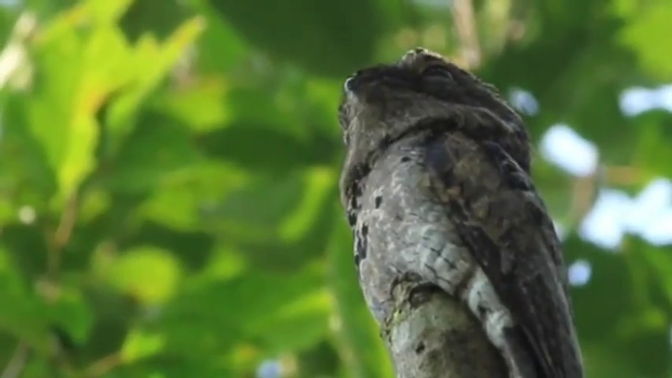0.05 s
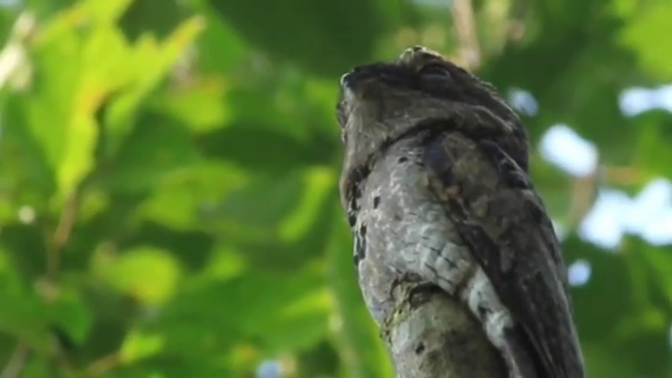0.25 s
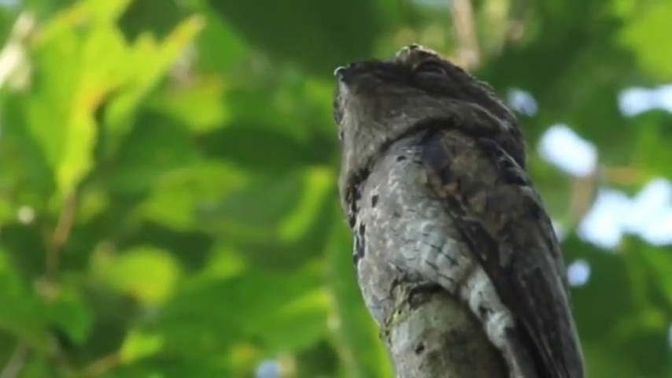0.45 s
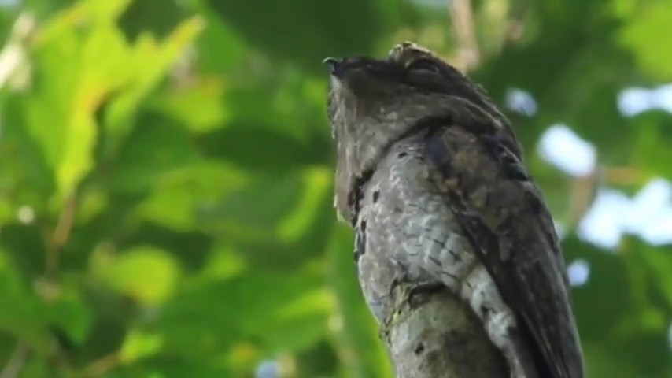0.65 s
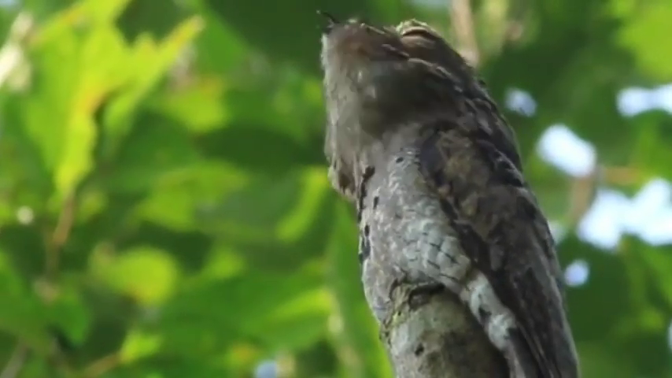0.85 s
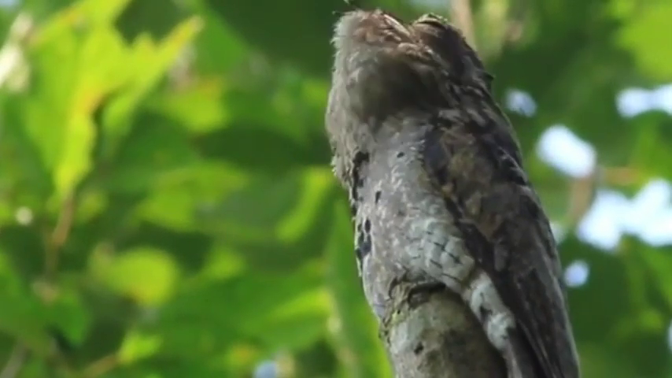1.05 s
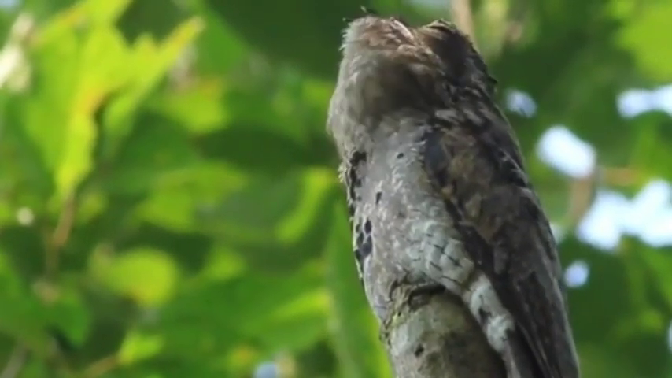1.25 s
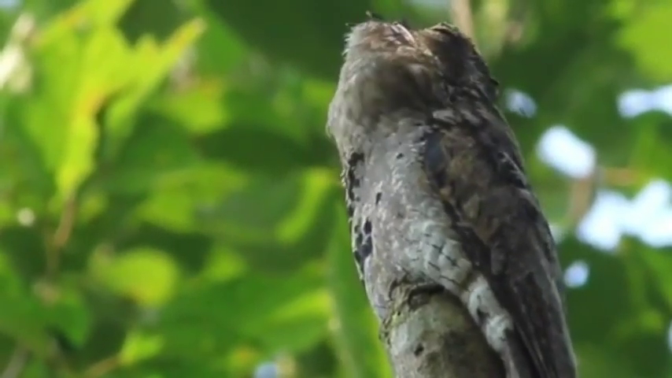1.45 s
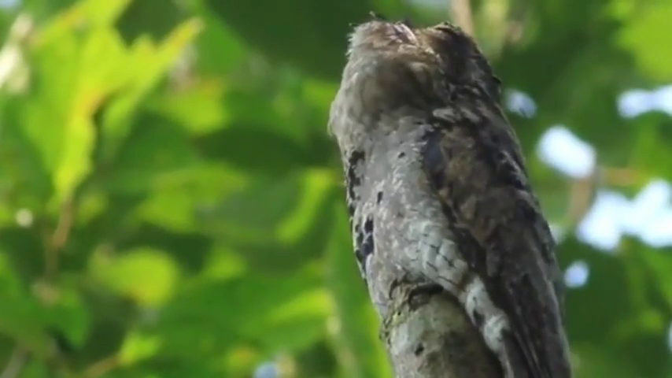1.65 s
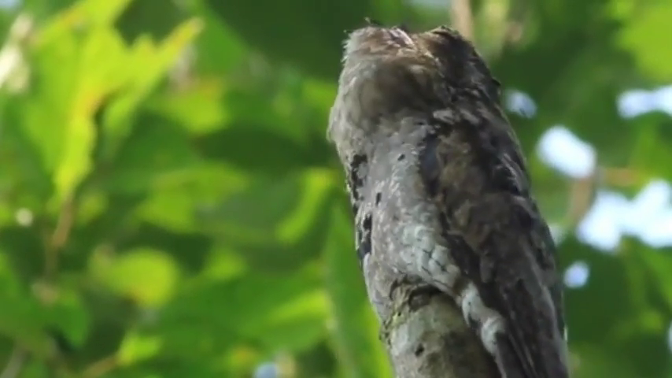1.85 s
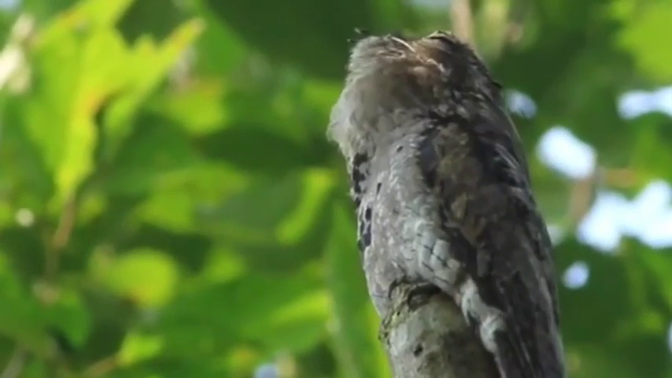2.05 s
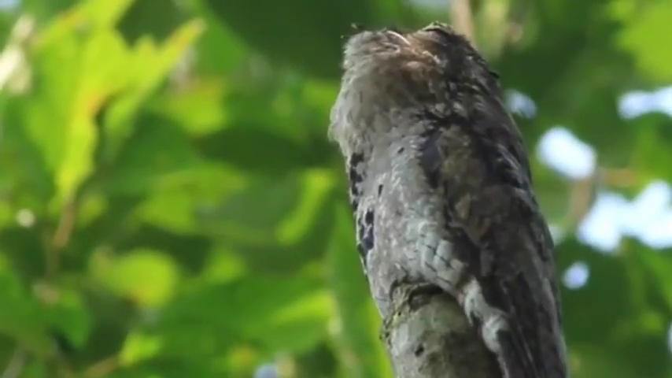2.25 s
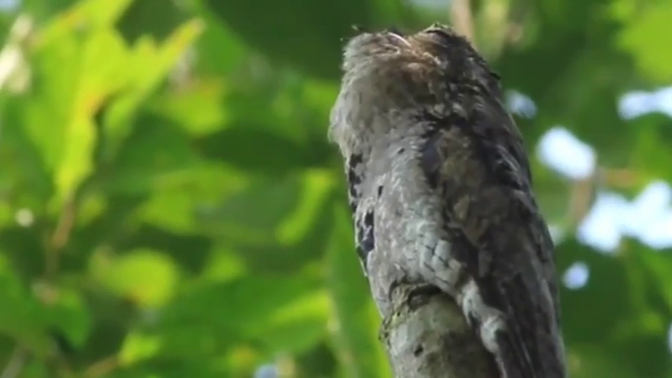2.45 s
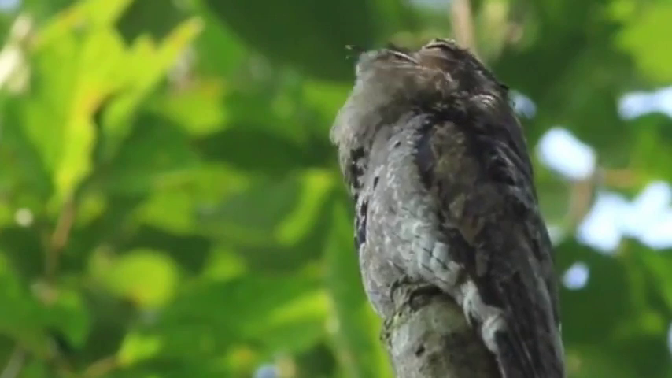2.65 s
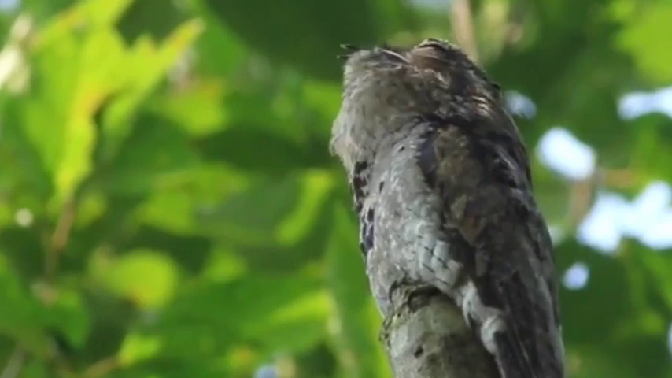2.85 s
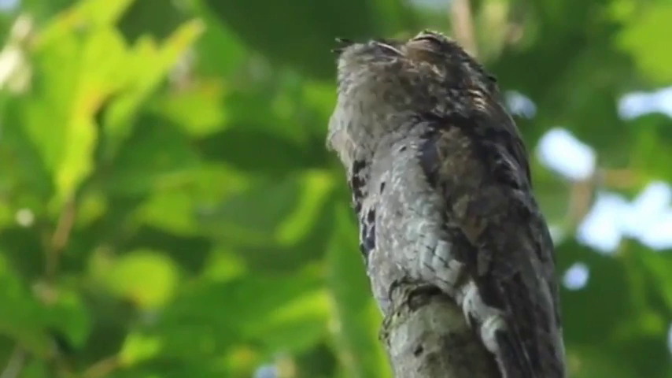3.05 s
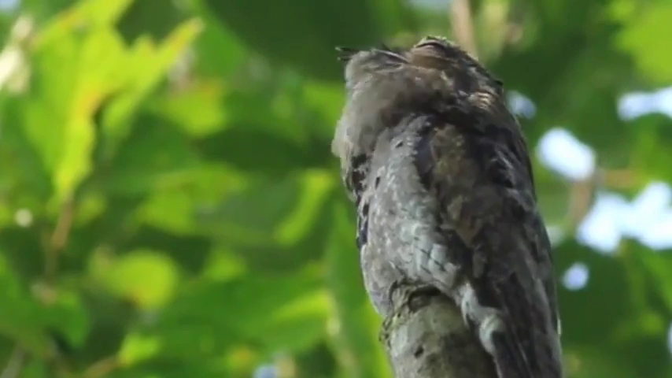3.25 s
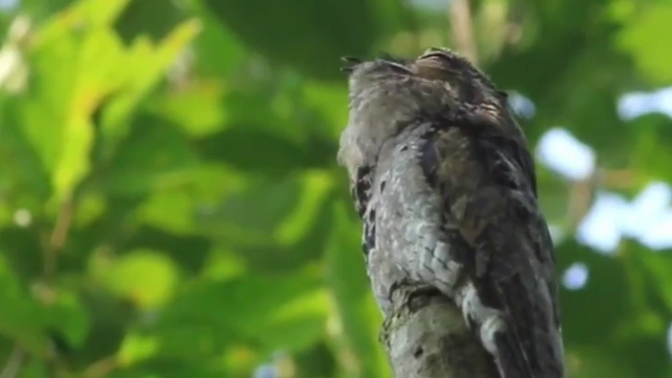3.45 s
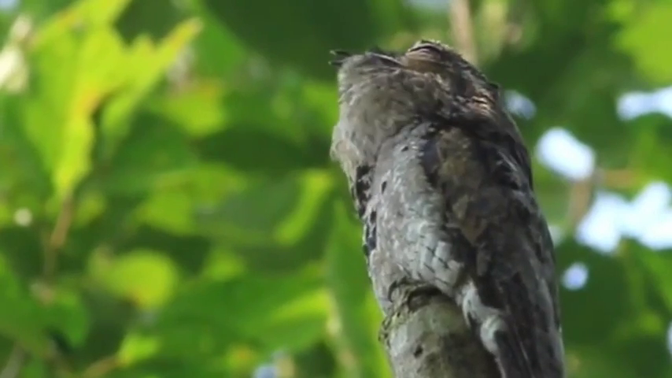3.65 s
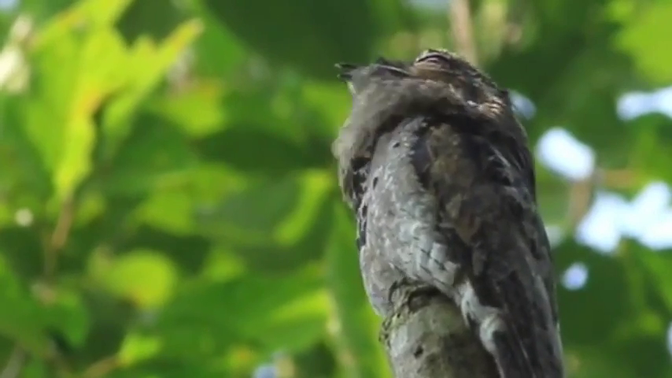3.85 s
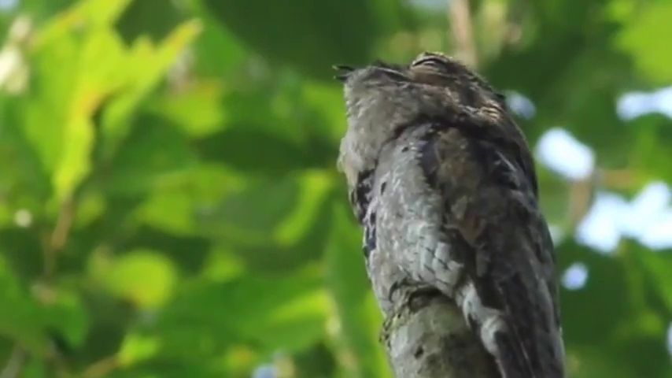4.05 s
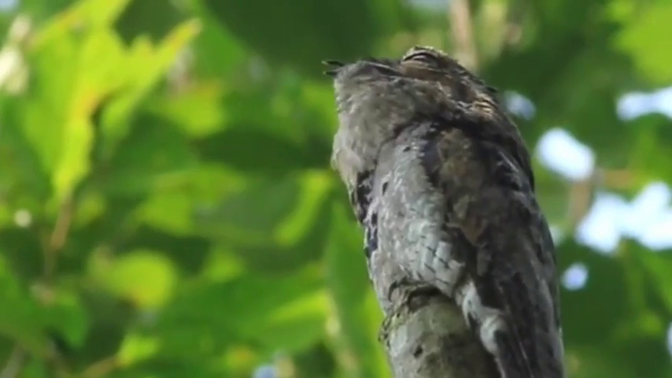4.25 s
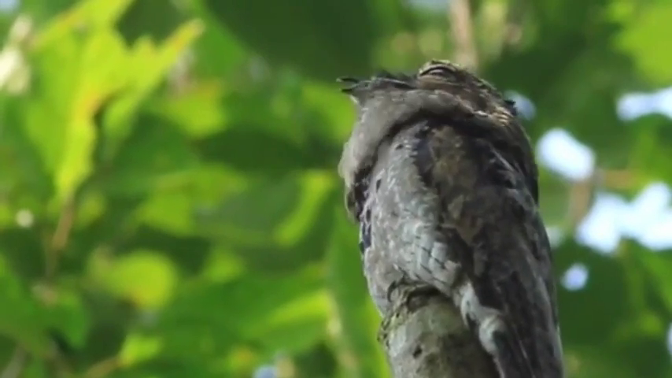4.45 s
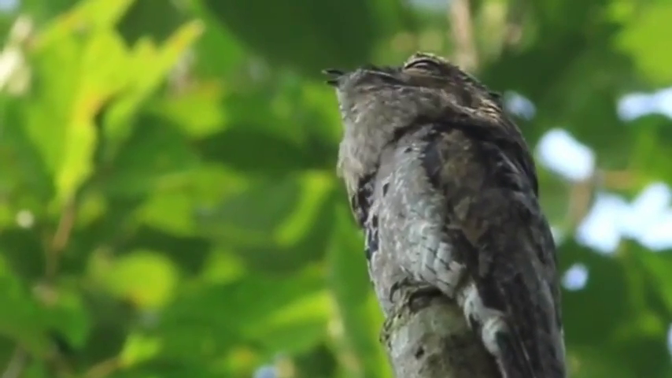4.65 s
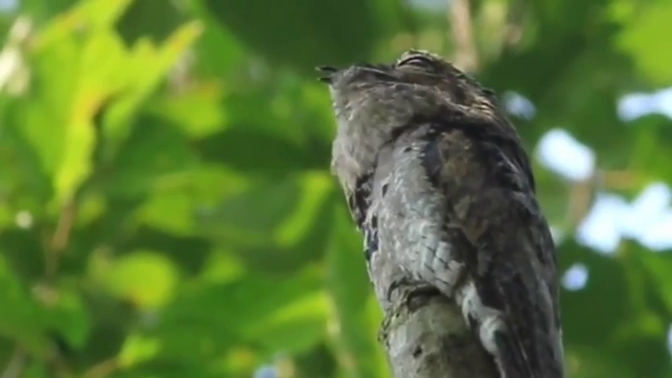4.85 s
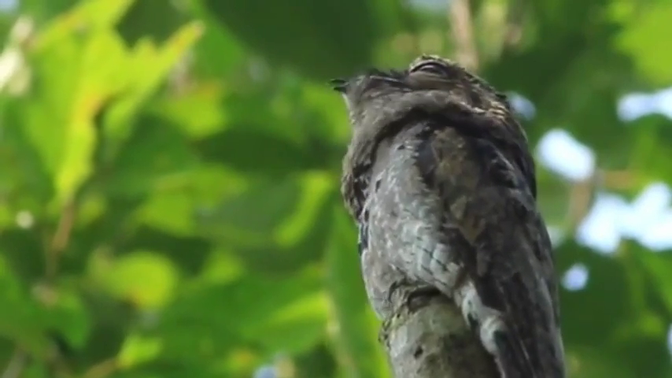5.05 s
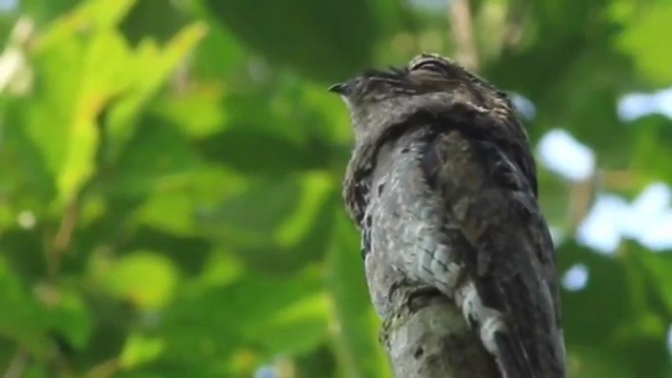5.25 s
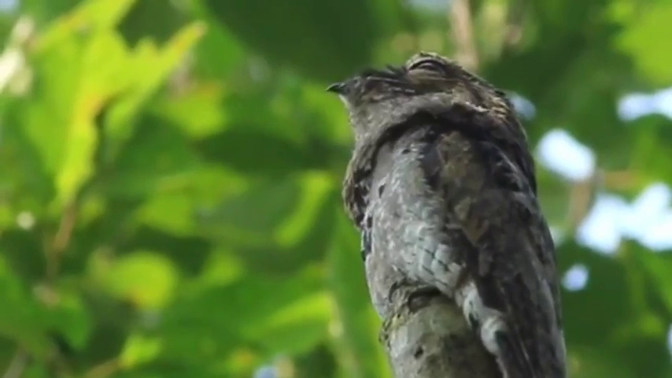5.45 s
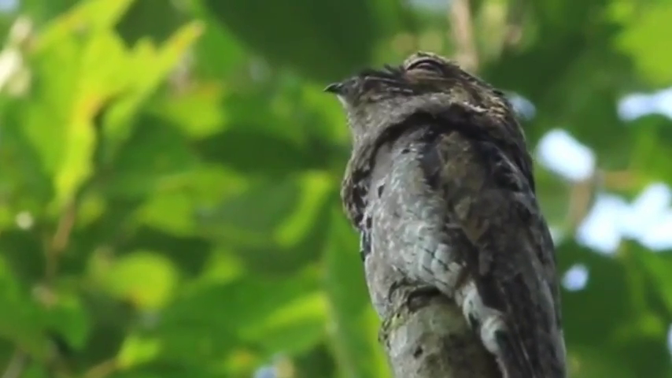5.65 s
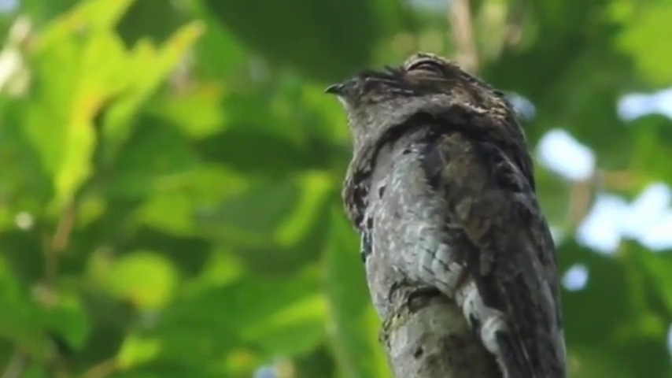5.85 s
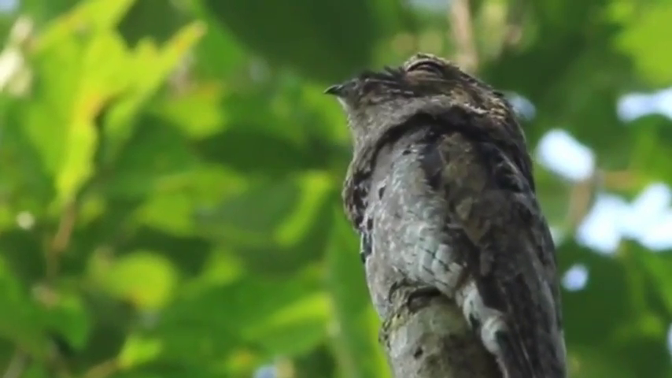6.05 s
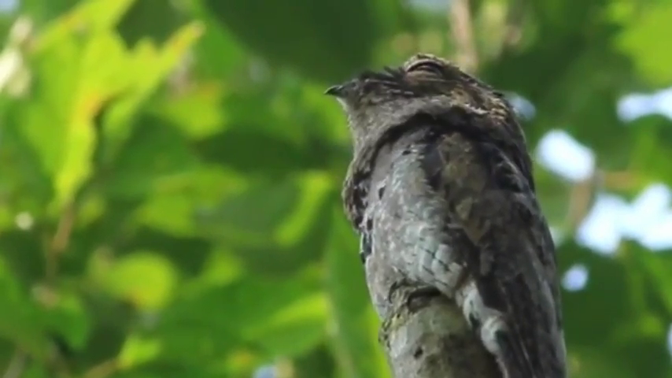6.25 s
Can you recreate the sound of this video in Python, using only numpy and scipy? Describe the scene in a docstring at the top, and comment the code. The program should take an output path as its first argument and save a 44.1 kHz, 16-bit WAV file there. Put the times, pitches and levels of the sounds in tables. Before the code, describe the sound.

In an echoing forest, a perched night bird sings six mournful, pure whistles, each lower and softer than the last, with tiny gulps between. Another bird gives a sharp rising buzz near the start and again late. Thin high peeps, a brief faint chatter, far dog barks and small twig snaps sit behind. The hiss of leaves is very soft, and the level fades at the end.

```python
"""Forest: a perched night bird whistles six mournful notes stepping down in pitch, with gulps between them.
A flycatcher gives two rising buzzy calls, small birds pipe and chatter, dogs bark far off, twigs snap.
Whistles are near sines with overtones, buzzes trilled sines, barks pulse trains, snaps noise bursts.
Decaying noise echoes all but a soft hiss; the level falls at the end. Table levels are before the mix."""
import sys
import numpy as np
from scipy import signal
from scipy.fft import rfft, irfft
from scipy.io import wavfile
from scipy.ndimage import uniform_filter1d

SR = 44100
rng = np.random.default_rng(int(sys.argv[2]) if len(sys.argv) > 2 else 0)


def master_out(mix):
    """Clip the mix to full scale and print it as 16-bit PCM to the path in sys.argv[1]."""
    frames = np.transpose(np.atleast_2d(mix))
    ceiling = np.clip(frames, -1, 1)
    pcm = np.round(ceiling * 32767).astype(np.int16)
    wavfile.write(sys.argv[1], SR, pcm)


N = 278271
T = np.arange(N) / SR


def undb(db):
    """Amplitude ratio of a level in dB."""
    return 10 ** (np.asarray(db) / 20)


def unit(x):
    """Scale to RMS 1."""
    return x / np.sqrt(np.mean(x ** 2))


def band(x, hz, width_hz):
    """One resonance, gain 1 at its centre."""
    return signal.lfilter(*signal.iirpeak(hz, hz / width_hz, fs=SR), x)


def bandlimit(x, edge_hz, kind, order):
    """Butterworth filter."""
    return signal.sosfilt(signal.butter(order, edge_hz, kind, fs=SR, output="sos"), x)


def walk(rate_hz):
    """Random levels held 1 / rate_hz s and slewed twice; RMS 1."""
    hold = max(int(SR / rate_hz), 1)
    steps = np.repeat(rng.standard_normal(N // hold + 1), hold)
    slewed = uniform_filter1d(uniform_filter1d(steps, hold), hold)
    return unit(slewed[:N])


def hump(start_s, length_s):
    """Progress 0-1 through a short call and its rounded envelope."""
    part = np.clip((T - start_s) / length_s, 0, 1)
    return part, np.sin(np.pi * part) ** 0.48


def phase(hz):
    """Running phase in radians of a varying pitch."""
    return 2 * np.pi * np.cumsum(hz) / SR


# relative spectrum of the hiss: (at_hz, density_db)
HISS_SPECTRUM = [(15, -52), (30, -33.5), (85, -15.5), (160, -13.5), (392, -3.5), (448, -2), (525, -2),
                 (800, -2.5), (1020, -5), (1800, -11), (3180, -15), (4990, -23.5), (6300, -23.5),
                 (8470, -21.5), (10700, -28), (14000, -40.5)]
HISS_DB = -52


def hiss():
    """A soft hiss of coloured noise, swelling a little, low and high apart."""
    hz = np.maximum(np.arange(N // 2 + 1) * SR / N, 1)
    at_hz, density_db = np.transpose(HISS_SPECTRUM)
    colour = undb(np.interp(np.log(hz), np.log(at_hz), density_db))
    high_share = hz ** 2 / (hz ** 2 + 2500 ** 2)

    def part(share):
        noise = rng.standard_normal(N) * undb(0.5 * walk(10))
        return irfft(rfft(noise) * colour * np.sqrt(share), N)

    low, high = part(1 - high_share), part(high_share)
    return undb(HISS_DB) * unit(low + high * undb(0.23 * walk(15)))


FOREST_T60_S, FOREST_TREBLE_T60_S = 0.89, 0.33
FOREST_SPLIT_HZ, FOREST_ONSET_S, FOREST_LENGTH_S = 1800, .012, 1.5


def forest(x):
    """Echoes from countless trunks: decaying noise, the treble dying sooner."""
    t = T[:int(FOREST_LENGTH_S * SR)]
    noise = rng.standard_normal(len(t)) * np.minimum(t / FOREST_ONSET_S, 1)
    low = bandlimit(noise, FOREST_SPLIT_HZ, "low", 4)
    high = bandlimit(noise, FOREST_SPLIT_HZ, "high", 4)
    tail = low * 1000 ** (-t / FOREST_T60_S) + high * 1000 ** (-t / FOREST_TREBLE_T60_S)
    tail = tail / np.sqrt(SR * FOREST_T60_S / (2 * np.log(1000)))
    return signal.fftconvolve(x, tail)[:N]


# faint chatter notes: (start_s, length_s, drive_db)
CHATTER_NOTES = [(2.043, 0.0294, -60.5), (2.132, 0.061, -59.5), (2.244, 0.045, -58), (2.491, 0.051, -64.5),
                 (2.555, 0.055, -65.5)]
CHATTER_HZ = 493


def chatter():
    """Quick harsh notes of which only three rough harmonics carry."""
    turn = phase(CHATTER_HZ * (1 + .02 * walk(25) + 0.026 * walk(300)))
    voice = sum(undb(4 * walk(30)) * np.sin(k * turn) for k in range(5, 8))
    gain = sum(undb(db) * hump(start_s, length_s)[1] for start_s, length_s, db in CHATTER_NOTES)
    return voice * gain


# small birds' glides, and thin high overtones of the first whistled note (rows at 1.431, 1.451,
# 1.834, 1.836 s): (start_s, length_s, from_hz, to_hz, level_db, shiver_rms_hz)
THIN_GLIDES = [(0.049, 0.119, 9540, 9450, -62.5, 40.4), (0.121, 0.1, 8000, 8030, -62, 200),
               (0.232, 0.11, 7440, 7640, -56, 184), (0.36, 0.12, 7430, 7010, -68, 200),
               (0.484, 0.14, 6920, 7346, -54, 130.5), (0.652, 0.071, 6980, 6950, -47, 68.5),
               (0.653, 0.108, 5240, 5300, -60, 49.3), (0.766, 0.1, 6576, 6536, -47.5, 79),
               (0.772, 0.11, 4810, 4808, -60, 200.2), (1.122, 0.075, 6780, 7970, -54.5, 343),
               (1.431, 0.2, 9934, 9760, -59.5, 29.5), (1.451, 0.13, 8980, 8880, -62, 40.1),
               (1.834, 0.12, 8850, 8850, -60, 39.8), (1.836, 0.26, 9720, 9910, -62.5, 30.2),
               (2.248, 0.225, 10480, 10710, -67, 69.5), (2.401, 0.22, 10810, 10270, -63.5, 79.8),
               (2.835, 0.17, 7130, 7280, -63, 30.35)]


def thin_glides():
    """Sine glides with shivering pitch: small birds, and high overtones of the first whistled note."""
    out, shiver = 0, walk(400)
    for start_s, length_s, from_hz, to_hz, level_db, shiver_hz in THIN_GLIDES:
        part, env = hump(start_s, length_s)
        hz = from_hz + (to_hz - from_hz) * part + shiver_hz * shiver
        out = out + undb(level_db) * env * np.sin(phase(hz))
    return np.sqrt(2) * out


# far barks: (start_s, length_s, nominal_pitch_hz, drive_db, roughness_0_to_1)
FAR_BARKS = [(0.331, 0.092, 477, -44.5, 0.41), (0.91, 0.11, 566, -46, 0.62),
             (1.618, 0.17, 572, -48.5, 0.72), (3.528, 0.066, 498.5, -44, 0.3),
             (3.721, 0.11, 299, -48, 0.36), (4.255, 0.1, 503, -48, 0.64), (4.368, 0.075, 470, -56, 0.11),
             (4.844, 0.11, 406.7, -44.5, 0.47), (5.031, 0.1, 349, -51, 0.32),
             (5.343, 0.13, 330.9, -46, 0.44), (5.662, 0.038, 338.2, -54, 0.3)]
# muzzle resonances, each applied twice: (centre_hz, single_pass_width_hz, gain_db)
MUZZLE_RESONANCES = [(486, 120, -2), (630, 273, 4), (908, 330, 3.5), (1595, 290, -9)]


def dogs():
    """Arched pulse trains mixed with breath noise through the muzzle's resonances."""
    out, noise = 0, rng.standard_normal(N)
    for start_s, length_s, pitch_hz, drive_db, rough in FAR_BARKS:
        part, env = hump(start_s, length_s)
        turn = phase(pitch_hz * (.93 + 0.073 * env))
        pulses = sum(np.cos(k * turn) for k in range(1, 6))
        rough = np.clip(rough, 0, 1)
        out = out + undb(drive_db) * env * ((1 - rough) * pulses + 8.8 * rough * noise)
    return sum(undb(db) * band(band(out, hz, width_hz), hz, width_hz)
               for hz, width_hz, db in MUZZLE_RESONANCES)


# twig snaps, a knock on wood, beak clicks: (start_s, body_drive_db, treble_drive_db, ring_t60_s, treble_hz)
SNAP_EVENTS = [(0.992, -44.5, -67, 0.14, 4000), (2.006, -41, -64.5, 0.11, 4030),
               (3.345, -65, -52, .1, 8000), (2.735, -45, -62, 0.057, 4000), (3.505, -31.5, -48, 0.15, 4960),
               (4.122, -48.5, -44.5, 0.15, 4500), (4.197, -58, -40, 0.04, 3600),
               (4.219, -42, -41.5, 0.05, 8900), (4.29, -56, -45, 0.13, 4200),
               (4.472, -52, -60, 0.045, 4980), (4.96, -38, -50, .02, 7000), (4.945, -67, -53.5, .25, 7000),
               (5.429, -46, -57, 0.033, 6000), (6, -43.5, -67, 0.0653, 4000)]
# wood resonances, each applied twice: (centre_hz, single_pass_width_hz, gain_db)
WOOD_RESONANCES = [(516, 190, 11.5), (780, 120, 15), (997, 120, 17), (1211, 650, 16.5), (1685, 800, 8.5),
                   (2830, 1500, -8)]


def twigs():
    """Dying bursts of noise ring the wood; a crackle of its own brightness rides on each."""
    body, crackle = 0, 0
    noise = rng.standard_normal(N) * undb(2.5 * walk(300))
    for start_s, body_db, treble_db, ring_s, treble_hz in SNAP_EVENTS:
        age_s = np.maximum(T - start_s, 0)
        env = (T > start_s) * (1000 ** (-age_s / ring_s) + 0.4 * np.exp(-age_s / 0.002))
        body = body + undb(body_db) * env
        crackle = crackle + band(undb(treble_db) * env * noise, treble_hz, treble_hz)
    wood = sum(undb(db) * band(band(body * noise, hz, width_hz), hz, width_hz)
               for hz, width_hz, db in WOOD_RESONANCES)
    return wood + bandlimit(crackle, [1800, 10000], "band", 2)


# flycatcher calls: (start_s, length_s, mid_level_db, level_change_db, final_trill_depth_hz)
BUZZ_CALLS = [(0.202, .445, -22.5, -3, 578), (4.784, 0.43, -20.5, -5.5, 568)]
BUZZ_BASE_HZ, BUZZ_CLIMB_HZ_PER_S = 2644, 1750
BUZZ_LEAP_HZ, BUZZ_LEAP_S, BUZZ_SAG_HZ, BUZZ_SAG_S = 720, .022, 248, .05
BUZZ_ATTACK_S, BUZZ_RELEASE_S, BUZZ_EDGE_DB = 0.067, 0.081, -31
TRILL_START_HZ, TRILL_SLOWING, TRILL_THROB = 211.2, 0.19, 0.37  # slowing and throb are shares
BUZZ_PIPE_HZ, BUZZ_SECOND_DB, BUZZ_THIRD_DB, BUZZ_BREATH_DB = 2790, -40.5, -44, -42.5


def flycatcher():
    """A rising whistle whose pitch trembles fast and ever wider, turning into a buzz."""
    out, breath = 0, unit(band(rng.standard_normal(N), 5700, 4000))
    for start_s, length_s, level_db, change_db, depth_hz in BUZZ_CALLS:
        part = hump(start_s, length_s)[0]
        age_s, left_s = part * length_s, (1 - part) * length_s
        leap_hz = BUZZ_LEAP_HZ * np.exp(-age_s / BUZZ_LEAP_S)
        sag_hz = BUZZ_SAG_HZ * np.exp(-left_s / BUZZ_SAG_S)
        hz = BUZZ_BASE_HZ + BUZZ_CLIMB_HZ_PER_S * age_s - leap_hz - sag_hz

        attack = np.maximum(1 - age_s / BUZZ_ATTACK_S, 0) ** 1.3
        release = np.maximum(1 - left_s / BUZZ_RELEASE_S, 0)
        gain_db = level_db + change_db * (part - .5) + BUZZ_EDGE_DB * (attack + release)
        gain = undb(gain_db) * (age_s > 0) * (left_s > 0)

        cycle = phase(TRILL_START_HZ * (1 - TRILL_SLOWING * part) + 24 * part * walk(60))
        swung_hz = hz + depth_hz * part * (np.sin(cycle) + .13 * walk(300))
        turn = phase(swung_hz)
        throb = gain * (1 + TRILL_THROB * np.minimum(4 * part, 1) * np.cos(cycle + 0.66))
        tone = throb * np.sin(turn) / np.sqrt(1 + ((swung_hz - 3050) / 900) ** 4)

        # after the opening leap the windpipe cuts what lies under its lower edge
        opening = np.exp(-(age_s / 0.059) ** 2)
        piped = bandlimit((1 - opening) * tone, BUZZ_PIPE_HZ, "high", 8)
        second = (undb(BUZZ_SECOND_DB) + undb(-3.5 - 360 * part)) * np.sin(2 * turn)  # strong at onset
        third = undb(BUZZ_THIRD_DB) * np.sin(3 * turn)
        out = out + opening * tone + piped + throb * (second + third + undb(BUZZ_BREATH_DB) * breath)
    return np.sqrt(2) * out


# each note's level among the trees, where echoes swell and cancel it; per note: (time_s, level_db)
SONG_LEVELS = [
    [(.96, -47), (.995, -22), (1.05, -17), (1.083, -32.5), (1.096, -18), (1.108, -26), (1.122, -15.5),
     (1.19, -16), (1.2, -19.5), (1.214, -14), (1.228, -18.5), (1.247, -10), (1.29, -14), (1.33, -20),
     (1.365, -22.5), (1.392, -10), (1.418, -22), (1.44, -15), (1.465, -15), (1.485, -19.5), (1.503, -15),
     (1.535, -18), (1.566, -28.5), (1.59, -25), (1.612, -32), (1.64, -25), (1.732, -22), (1.782, -25),
     (1.834, -34.5), (1.876, -27.5), (1.904, -42), (1.95, -22.5), (1.986, -18), (2.003, -18.5)],
    [(2.14, -52), (2.165, -48.5), (2.19, -53), (2.215, -38), (2.235, -47.5), (2.255, -33), (2.275, -36),
     (2.296, -22), (2.314, -17.5), (2.345, -25), (2.36, -37.5), (2.39, -44.5), (2.415, -33), (2.44, -36),
     (2.472, -27.5), (2.638, -23), (2.712, -24), (2.728, -24.5)],
    [(2.91, -51), (2.95, -38.5), (3.03, -29), (3.112, -36), (3.228, -24.5), (3.272, -25), (3.304, -31),
     (3.33, -27), (3.354, -24), (3.37, -34)],
    [(3.55, -48), (3.58, -40), (3.7, -32.5), (3.768, -28), (3.805, -37.5), (3.84, -32.5), (3.9, -33.5),
     (3.915, -34.5), (3.928, -28), (3.937, -34)],
    [(4.07, -50), (4.114, -57), (4.174, -36.5), (4.258, -37.5), (4.384, -48.5), (4.426, -40.5),
     (4.465, -39.5)],
    [(4.69, -56), (4.716, -40.5), (4.754, -37), (4.962, -34), (4.982, -43.5), (5.004, -33.5), (5.022, -39)],
]
# whistle pitch; per note: (time_s, pitch_hz)
SONG_PITCH = [
    [(.96, 959.5), (1.02, 1010), (1.07, 1055), (1.12, 1111), (1.17, 1159), (1.23, 1183), (1.3, 1180),
     (1.38, 1157), (1.48, 1132), (1.58, 1086), (1.74, 1081), (1.9, 1065), (2.005, 1054)],
    [(2.14, 858), (2.165, 857), (2.21, 883), (2.25, 870), (2.31, 901.9), (2.37, 914.6), (2.6, 923.5),
     (2.73, 929)],
    [(2.92, 786.8), (3.056, 770.5), (3.258, 780), (3.32, 794), (3.37, 834)],
    [(3.56, 698), (3.7, 697), (3.86, 709.3), (3.92, 740), (3.935, 747)],
    [(4.08, 604), (4.2, 625.3), (4.33, 639), (4.39, 666.9), (4.448, 748), (4.465, 756)],
    [(4.7, 605), (4.73, 586.6), (4.818, 581.9), (4.952, 589.5), (5.02, 637.4)],
]
# the bird's steady effort; one per note: effort_db
SONG_EFFORT_DB = [-19.5, -31, -31, -32.5, -46, -51]
RELEASE_S, BEAK_OPENS_S, END_DROP_HZ, PITCH_HOLD_S = .006, .3, 159.9, .06


def song_controls():
    """Pitch, gain as heard, effort and beak opening; each note breaks downward as it stops."""
    on, effort, beak, drop = np.zeros(N), 0, 0, 0
    for effort_db, levels in zip(SONG_EFFORT_DB, SONG_LEVELS):
        start_s, end_s = levels[0][0], levels[-1][0]
        sounding = (T > start_s) * np.exp(-np.maximum(T - end_s, 0) / RELEASE_S)
        on = on + sounding
        effort = effort + undb(effort_db) * sounding * np.clip((T - start_s) / .05, 0, 1)
        beak = np.where(T > start_s, np.clip((T - start_s) / BEAK_OPENS_S, 0, 1) ** 2, beak)
        stopping = (T > end_s) * (T < end_s + 5 * RELEASE_S)
        drop = drop + stopping * (1 - sounding) ** 2

    held = []  # end pitches held a little beyond each note
    for note in SONG_PITCH:
        (first_s, first_hz), (last_s, last_hz) = note[0], note[-1]
        held += [(first_s - PITCH_HOLD_S, first_hz), *note, (last_s + PITCH_HOLD_S, last_hz)]
    hz = uniform_filter1d(np.interp(T, *np.transpose(held)), int(.03 * SR)) - END_DROP_HZ * drop
    level_db = np.interp(T, *np.concatenate(SONG_LEVELS).T)
    gain = uniform_filter1d(undb(level_db), int(0.0013 * SR))
    return hz, gain * uniform_filter1d(on, int(0.0032 * SR)), effort, beak


# overtones against the fundamental, coloured by the throat: (at_hz, base_db)
THROAT_COLOUR = [(1200, -34), (1550, -32.5), (1770, -26.5), (1810, -38), (1850, -39), (2050, -36),
                 (2300, -36), (2900, -47), (3250, -45.5), (3500, -53.5), (3900, -55), (4300, -39),
                 (4550, -30), (4750, -38), (5050, -47.5), (5250, -37.5), (5430, -36.5), (5700, -46),
                 (5900, -49), (6450, -40.5), (7000, -59), (7800, -73.5)]
# gulps before notes two to six: (start_s, level_db)
GULP_EVENTS = [(2.125, -45), (2.845, -42), (3.455, -43), (4.039, -44.5), (4.58, -47)]
GULP_S, GULP_FROM_HZ, GULP_TO_HZ = .036, 320, 572
OPEN_BEAK_DB, CLOSING_DB_PER_S = -1.5, 6  # third harmonic up; fading after the first note
HIGH_HARMONICS_DB = -5.5  # sixth harmonic up


def whistler():
    """A near sine with gulps and, apart, faint overtones that follow effort and waver one by one."""
    hz, gain, effort, beak = song_controls()
    first_end_s = SONG_LEVELS[0][-1][0]
    beak_db = OPEN_BEAK_DB - CLOSING_DB_PER_S * np.maximum(T - first_end_s, 0)
    turn = phase(hz + 2.5 * walk(30))
    song, overtones = gain * np.sin(turn), 0
    throat_hz, throat_db = np.transpose(THROAT_COLOUR)
    for k in range(2, 10):
        db = np.interp(np.log(k * hz), np.log(throat_hz), throat_db)
        db = db + 1.5 * walk(7.27) + 3.0 * walk(44.92)
        db = db + (k > 2) * beak_db + (k >= 6) * HIGH_HARMONICS_DB
        opening = beak if k > 2 else 1
        overtones = overtones + effort * opening * undb(db) * np.sin(k * turn)

    breathy_hz = 70 * walk(150)
    for start_s, level_db in GULP_EVENTS:
        part, env = hump(start_s, GULP_S)
        gulp_hz = GULP_FROM_HZ + (GULP_TO_HZ - GULP_FROM_HZ) * part + breathy_hz
        song += undb(level_db) * env * np.sin(phase(gulp_hz))
    return np.sqrt(2) * song, np.sqrt(2) * overtones


def scene():
    """Direct sound, forest echo and hiss; each source has its own share of echo."""
    song, overtones = whistler()
    # (source, direct_db, echo_db)
    mix = [(song, 0, -11), (overtones, -1.5, -0.1), (flycatcher(), -6, -4),
           (thin_glides() + chatter(), 0, 3.5), (dogs(), 1.5, 2), (twigs(), 0, -8)]
    direct = sum(undb(direct_db) * source for source, direct_db, _ in mix)
    echo = forest(sum(undb(echo_db) * source for source, _, echo_db in mix))
    return (direct + echo + hiss())[None]


# overall gain: (time_s, gain_db)
FADE_GAIN = [(5.299, 2.5), (5.801, 0), (6.31, -6)]
TOP_HZ = 14000


def record(dry):
    """The level is faded down at the end and the top is cut."""
    time_s, gain_db = np.transpose(FADE_GAIN)
    faded = dry * undb(np.interp(T, time_s, gain_db))
    return signal.sosfilt(signal.ellip(10, .2, 70, TOP_HZ, fs=SR, output="sos"), faded)


dry = scene()
out = record(dry)
master_out(out)
```